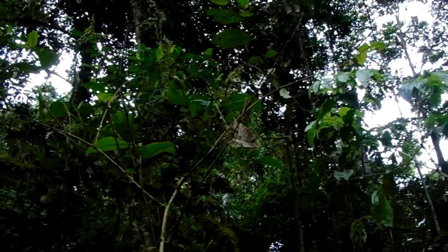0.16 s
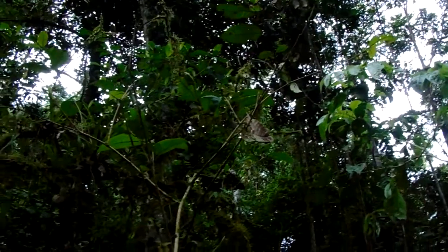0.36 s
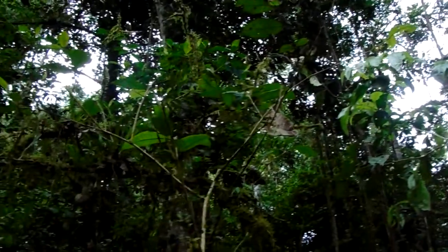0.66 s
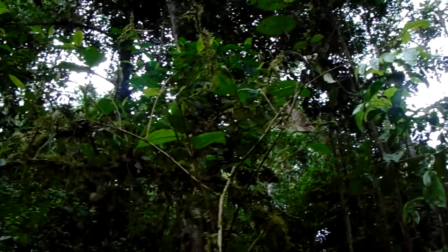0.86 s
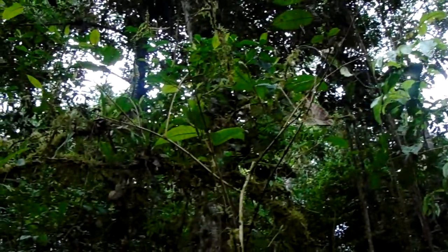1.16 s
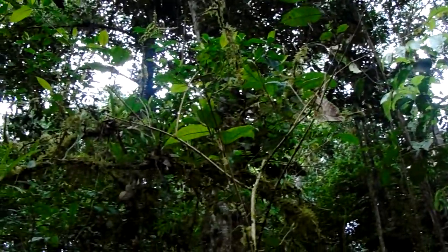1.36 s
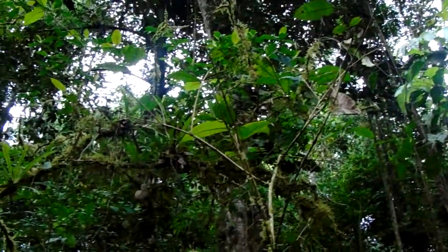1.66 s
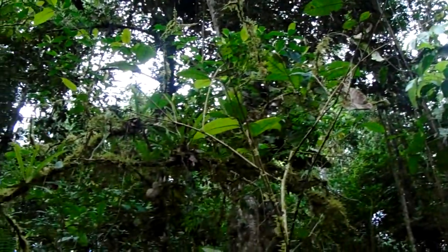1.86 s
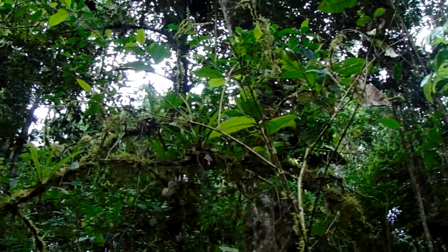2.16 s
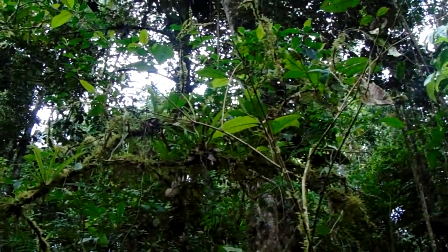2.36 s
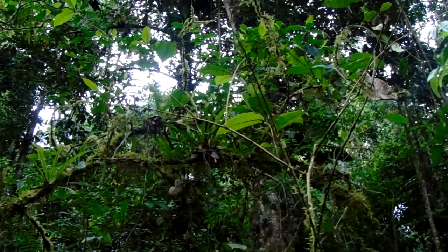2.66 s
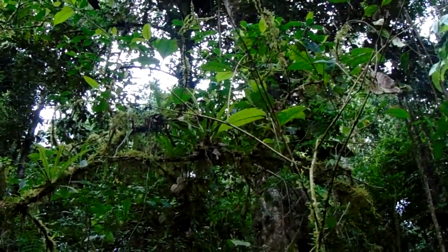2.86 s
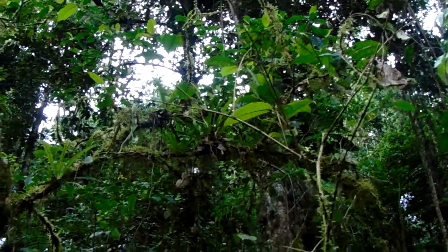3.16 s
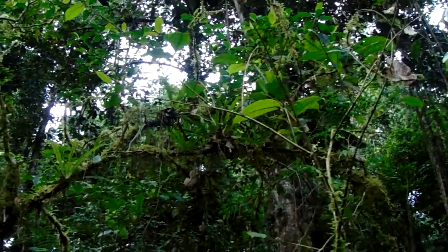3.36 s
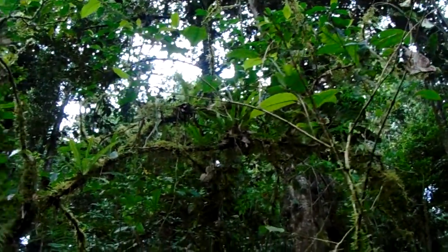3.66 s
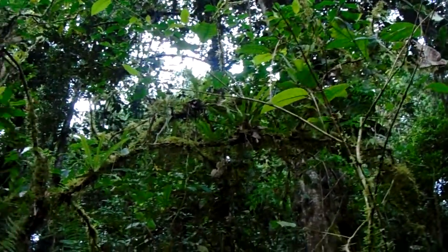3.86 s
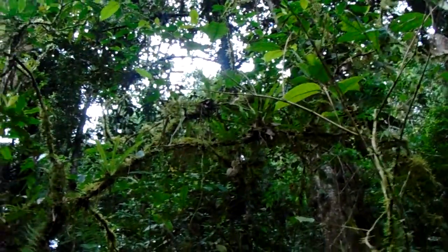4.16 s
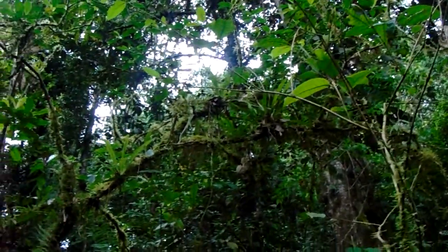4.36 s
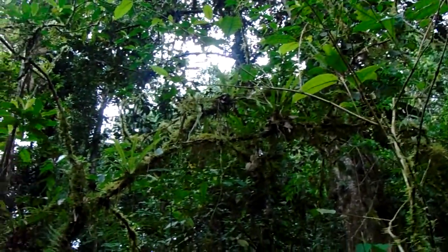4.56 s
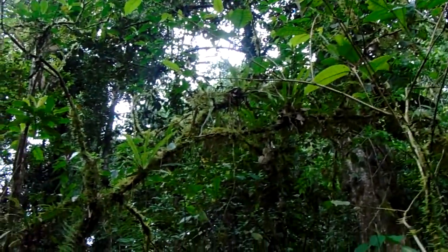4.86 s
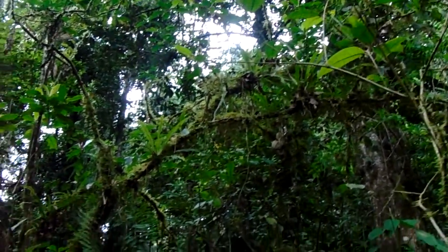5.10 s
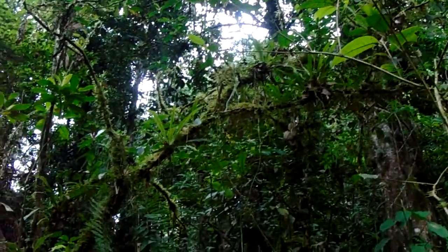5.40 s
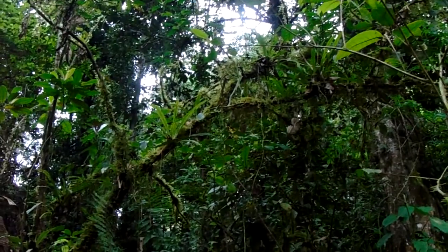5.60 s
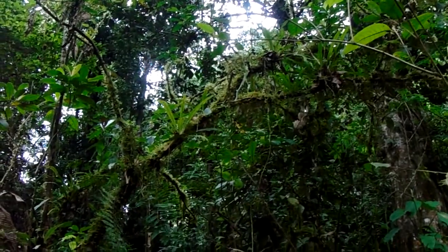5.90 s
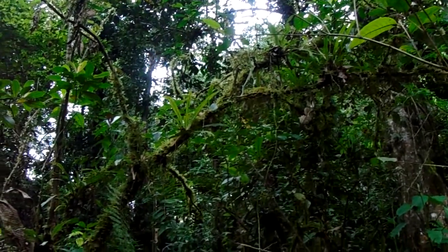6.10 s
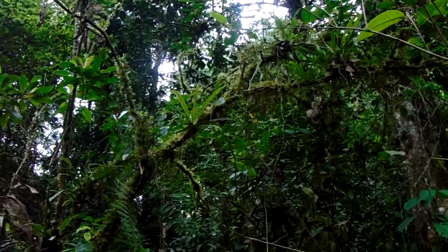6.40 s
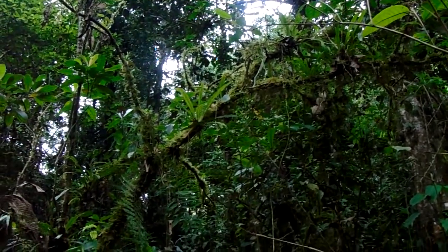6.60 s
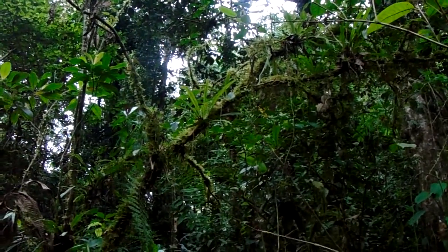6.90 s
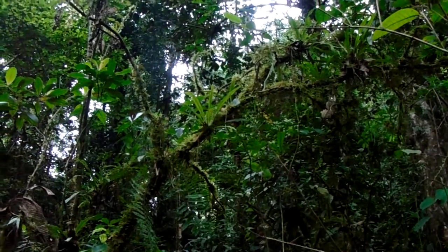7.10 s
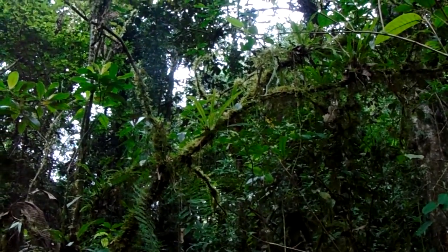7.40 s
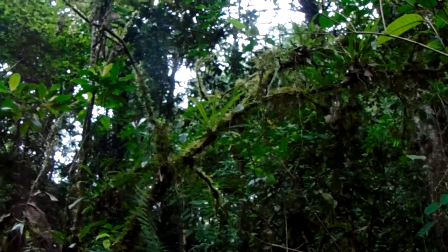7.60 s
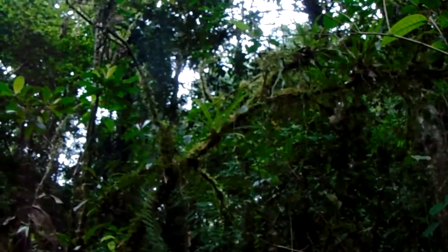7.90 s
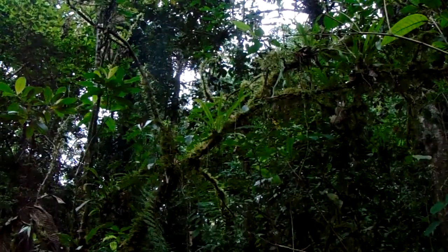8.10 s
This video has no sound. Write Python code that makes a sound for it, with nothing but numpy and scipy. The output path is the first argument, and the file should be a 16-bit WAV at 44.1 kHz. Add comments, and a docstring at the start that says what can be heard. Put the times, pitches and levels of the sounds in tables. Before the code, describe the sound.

Shrill crickets and hissing insects fill a forest while a near bird gives sweeping up-and-down whistles, faint neighbours answer, and drops tap leaves.

```python
"""A near bird whistles a loud up-and-down call ending on a low held note; two far neighbours answer with the same call.
Around it, crickets chirp and trill near 7 kHz, far insects hiss, birds hoot and chip, and drops tap on leaves.
Whistles and bird notes are sine tones with moving pitch; crickets are tones pulsed by wing strokes.
Hiss, rattles and drops are filtered noise. Decaying noise echoes stand for scattering by trunks and leaves."""
import sys
import numpy as np
from scipy import signal
from scipy.fft import rfft, irfft
from scipy.io import wavfile

SR = 44100
rng = np.random.default_rng(int(sys.argv[2]) if len(sys.argv) > 2 else 0)


def pcm_store(signal):
    """Save signal as 16-bit PCM."""
    levels = np.round(np.clip(np.atleast_2d(signal), -1, 1) * 32767)
    wavfile.write(sys.argv[1], SR, levels.astype(np.int16).T)


N = 363825
T = np.arange(N) / SR   # time in s

# basic pitch of the call's first note, which shoots up and keeps climbing: time into the note t/s, f/Hz
RISE = [(0, 1250), (.025, 1850), (.059, 3800), (.075, 4280), (.1, 4500), (.395, 5000), (.41, 5180),
        (.49, 5220)]
FALL_AFTER_S, CLOSING_AFTER_S = .56, 1.042   # start of the second and the closing note within the call
SOFT_STROKES = 32   # average wing strokes per second of the two soft crickets


def from_db(db):
    """Turn decibels into a gain."""
    return 10 ** (np.asarray(db) / 20)


def rms_one(x):
    """Scale a signal to rms 1."""
    return x / np.sqrt(np.mean(x ** 2) + 1e-20)


def noise(spectrum):
    """Noise of rms 1, coloured by a table of pitch and relative level."""
    hz, db = np.transpose(spectrum)
    bins = np.maximum(np.fft.rfftfreq(N, 1 / SR), 1)
    gain = from_db(np.interp(np.log(bins), np.log(hz), db))
    white = rng.standard_normal(N)
    return rms_one(irfft(rfft(white) * gain, N))


def drift(rate):
    """Random wandering of rms 1: straight lines joining `rate` random points a second."""
    knots = rng.standard_normal(8192)
    return rms_one(np.interp(T * rate, np.arange(len(knots)), knots))


def band(x, low_hz, high_hz, order=2):
    """Keep one range of pitches with a Butterworth band-pass."""
    high_hz = min(max(high_hz, 1.05 * low_hz), .45 * SR)
    sections = signal.butter(order, [low_hz, high_hz], "band", fs=SR, output="sos")
    return signal.sosfilt(sections, x)


def tone(hz):
    """A sine of about rms 1 that follows a pitch curve."""
    phase = 2 * np.pi * np.cumsum(hz) / SR
    return np.sqrt(2) * np.sin(phase)


def gate(start, length, edge):
    """Open for a while, with sloping edges; the closing slope follows after `length`."""
    end = start + max(length, edge)
    return np.interp(T, [start, start + edge, end, end + edge], [0, 1, 1, 0])


def forest(x, far=None):
    """Scattered sound only: dense early echoes from near leaves, then a slow tail from far trunks (fed by `far`)."""
    # scattering by trunks and leaves: f/Hz, early level/dB, early fall by 60 dB t/s,
    # late level/dB, late fall by 60 dB t/s
    scattering = np.array([(700, -5.5, 0.8, -16, 0.72), (1390, 2.5, 0.69, -3.5, 1.13),
                           (2200, -1, 0.8, -7.5, 1.94), (4090, 0.5, 0.94, -8.5, 2),
                           (5430, -1.5, 0.31, -1.5, 1.34), (8800, 5.5, 0.83, 4.5, 0.59),
                           (14000, 3, 0.64, -19, 0.72)])
    t = np.arange(2 * SR) / SR
    bins = np.fft.rfftfreq(len(t), 1 / SR)
    feeds = (x, x if far is None else far)
    out = 0
    for feed, decays in zip(feeds, (scattering[:, 1:3], scattering[:, 3:])):
        white = rfft(rng.standard_normal(len(t)))
        response = 0
        for share, (db, t60) in zip(np.eye(len(scattering)), decays):
            one_band = irfft(white * np.interp(bins, scattering[:, 0], share))
            # slow and fast decays get equal energy
            decay = np.sqrt(np.log(1e6) / (t60 * SR)) * np.exp(-np.log(1000) * t / t60)
            response = response + one_band * from_db(db) * decay
        response = response * np.minimum(t / 0.0037, 1)   # the echoes fade in
        out = out + signal.fftconvolve(feed, response)[:len(x)]
    return out


def background(swell_s=0.26, air_db=-47.5):
    """Countless far insects merge into bands of hiss above the soft rush of the forest."""
    # basic level of the insect chorus: t/s, level/dB
    chorus_level = [(0, -44), (1.4, -46.5), (1.8, -42.5), (3, -41), (4.4, -42.5), (5.4, -42), (5.75, -45),
                    (6.2, -41.5), (7, -43), (8.25, -45.5)]
    # colour of the chorus: f/Hz, relative level/dB
    chorus_colour = [(5900, -45), (6250, -16.5), (6500, -6.5), (6670, -5.5), (6800, -32), (6980, 1),
                     (7170, -1), (7330, 0), (7500, -7), (7680, -46)]
    # far insects that swell in and out around 5 kHz: start t/s, length t/s, basic level/dB
    shimmer_swells = [(1.55, 0.8, -57.5), (3.3, 1, -56.5), (7.2, 0.82, -55)]
    # colour of the soft rush: f/Hz, relative level/dB
    air_colour = [(20, -3.5), (50, -1.5), (120, -1.5), (300, -2.5), (700, -3), (1200, -2), (2500, -4),
                  (4000, -6), (5000, -4.5), (6000, -6.5), (8200, -6), (10000, -8.5), (11500, -14.5),
                  (14200, -17.5)]
    chorus_db = np.interp(T, *np.transpose(chorus_level)) + 0.91 * drift(17)
    chorus = from_db(chorus_db) * band(noise(chorus_colour), 5000, 9100)
    swells = sum(from_db(db) * gate(start, length, swell_s) for start, length, db in shimmer_swells)
    hiss = rms_one(band(rng.standard_normal(N), 4440, 5300))
    shimmer = swells * from_db(1.7 * drift(25)) * hiss
    air = from_db(air_db + 0.033 * drift(1.93)) * noise(air_colour)
    return chorus + shimmer + air


def katydid(start=6.95, length=1.6, level_db=-63):
    """A faint, thin rasp: a narrow band of noise near 11 kHz with an unsteady level."""
    rasp = rms_one(band(rng.standard_normal(N), 10760, 11200))
    return from_db(level_db + 2 * drift(30)) * gate(start, length, .1) * rasp


def far_rattle(pulses_per_s=20.1, duty=0.98):
    """A faint low pulsing wooden rattle: noise bursts through two hollow resonances."""
    # the rattles: start t/s, length t/s, low resonance level/dB, high resonance level/dB
    rattles = [(2.98, 0.17, -58.5, -62), (3.237, 0.5, -56, -59.5), (3.843, 0.53, -66.5, -58.5),
               (6.94, 0.78, -60, -60)]
    along_pulse = np.minimum(T * pulses_per_s % 1 / duty, 1)
    pulses = np.sin(np.pi * along_pulse) * rng.standard_normal(N)
    low, high = rms_one(band(pulses, 308, 420)), rms_one(band(pulses, 520, 700))
    out = 0
    for start, length, low_db, high_db in rattles:
        out = out + gate(start, length, 0.02) * (from_db(low_db) * low + from_db(high_db) * high)
    return out


def drops(decay_s=0.0059, wet_db=-21, dull_db=-42, db_per_octave=9):
    """A drop makes a limp leaf crack for a few milliseconds; the harder the tap, the higher it reaches."""
    # drops tapping on leaves: start t/s, peak level before echoes/dB, lower edge of the leaf's sound f/Hz
    taps = [(1.168, -34, 7000), (1.336, -37, 8000), (1.701, -36, 8000), (1.968, -34, 7000),
            (4.568, -24.5, 705), (6.9405, -13, 690), (6.9608, -10, 795), (6.9672, -25, 650),
            (7.173, -20.5, 790)]
    out, t = np.zeros(N), np.arange(SR // 20) / SR
    for start, db, low_hz in taps:
        high_hz = low_hz * 2 ** ((db - dull_db) / db_per_octave)
        crack = rng.standard_normal(len(t)) * np.exp(-t / decay_s)
        tap = band(crack, low_hz, high_hz, order=1)
        tap = band(tap, 0.73 * low_hz, 16000)
        at = round(start * SR)
        out[at:at + len(t)] += from_db(db) * tap / np.abs(tap).max()
    return out + from_db(wet_db) * forest(out)


def notes(rows, shape, length_s, rough, fade_db=0):
    """Notes of one kind swell and fade while bending through their shape; `rough` shakes the pitch."""
    out, shake = np.zeros(N), 1 + rough * drift(160)
    for start, hz, db in rows:
        on = (T >= start) & (T < start + length_s)
        along = (T[on] - start) / length_s   # 0 to 1 through the note
        bend = np.interp(along, np.linspace(0, 1, len(shape)), shape)
        swell = np.sqrt(np.sin(np.pi * along) + 1e-9)
        out[on] += from_db(db - fade_db * along) * swell * tone(hz * bend * shake[on])
    return out


def far_birds(direct_db=0, early_db=0, hoot_tail_db=1, peep_tail_db=3.0, chip_wet_db=-4.0, chip_tail_db=8.0,
              chip_direct_db=-1.5, burr_per_s=52, burr_depth=1.25):
    """Distant notes are sines heard mostly by way of the trunks; chips are nearer, thin squeaks dry."""
    # Each note table: start t/s, basic pitch f/Hz, basic level/dB.
    # Each shape: pitch ratios at even steps through the note.
    # low burred notes that lead into a hoot
    burr_notes, burr_shape = [(2.53, 805, -57), (4.26, 803, -55), (5.0, 803, -54.5)], (1.03, 1, .98, .98)
    # hoots that slide down and level off
    hoot_notes, hoot_shape = [(2.74, 950, -51), (3.18, 1021, -55.5), (4.47, 958, -48), (5.215, 1044, -46.5)], (1.18, 1.15, 1.04, 1, .99, 1, 1.01)
    # soft, nearly level peeps
    peep_notes, peep_shape = [(1.49, 3670, -57.5), (2.25, 3660, -58), (2.68, 3690, -60), (3.1, 3680, -60),
                              (3.95, 3730, -57)], (.97, 1, .96)
    # one upward zip
    zip_notes, zip_shape = [(3.44, 4580, -46.5)], (.8, 1, 1.27)
    # a quickening run of arched chips
    chip_notes, chip_shape = [(7.065, 3464, -41), (7.315, 3710, -42.5), (7.545, 3720, -42),
                              (7.755, 3730, -41.5), (7.94, 3840, -42), (8.11, 3760, -44)], (.85, .88, .92, 1, .9, .74)
    # thin falling squeaks
    squeak_notes, squeak_shape = [(1.97, 10200, -66), (7.18, 11700, -55)], (1.17, 1.03, .95, .87)
    burr = 1 + burr_depth * np.sin(2 * np.pi * burr_per_s * T)
    burrs = burr * notes(burr_notes, burr_shape, length_s=0.214, rough=0.021)
    low = burrs + notes(hoot_notes, hoot_shape, length_s=.3, rough=0.015, fade_db=9)
    peeps = notes(peep_notes, peep_shape, length_s=0.089, rough=0.0203)
    high = peeps + notes(zip_notes, zip_shape, length_s=.055, rough=.03)
    tails = from_db(hoot_tail_db) * low + from_db(peep_tail_db) * high
    distant = from_db(direct_db) * (low + high) + forest(from_db(early_db) * (low + high), tails)
    chips = notes(chip_notes, chip_shape, length_s=.07, rough=0.0514)
    chip_echoes = forest(from_db(chip_wet_db) * chips, from_db(chip_tail_db) * chips)
    nearer = from_db(chip_direct_db) * chips + chip_echoes
    squeaks = notes(squeak_notes, squeak_shape, length_s=0.26, rough=.0032, fade_db=3)
    return distant + nearer + squeaks


def wing_strokes(hz, per_s, duty, droop, jitter):
    """Each closing of the wings rings the wing for a moment, and the pitch sags along the stroke."""
    cycle = np.cumsum(per_s * (1 + jitter * drift(30))) / SR % 1
    stroke = np.minimum(cycle / duty, 1)   # 0 to 1 through the closing, then silent
    pitch = hz * (1 - droop * (stroke - .5) + 0.003974 * drift(200))
    return rms_one(np.sin(np.pi * stroke) * tone(pitch) * from_db(0.88 * drift(50)))


def chirping(first_chirp_s=.18, duty=.56, edge=.06):
    """Open for one chirp on every beat of a changing tempo; duty and edge are shares of a beat."""
    # the loud cricket hurries and slackens: from t/s, chirps per second
    tempo = [(0, 4.32), (1.8, 4.88), (2.21, 4.4), (4.03, 4.76), (4.66, 4.11), (6.12, 5.13), (6.51, 4.29)]
    # its level: t/s, level/dB
    chirp_level = [(0, -33), (.2, -42), (.62, -33), (1.3, -38.5), (3.2, -37), (4.2, -41), (5.3, -39),
                   (6.3, -41), (6.75, -37.5), (8.25, -39)]
    since, per_s = np.transpose(tempo)
    rate = per_s[np.searchsorted(since, T, "right") - 1]
    beats = np.cumsum(rate) / SR - first_chirp_s * per_s[0]
    off_beat = np.abs(beats - np.round(beats))
    opening = np.clip((duty / 2 - off_beat) / edge + .5, 0, 1)
    return from_db(np.interp(T, *np.transpose(chirp_level))) * opening


def crickets(trill_db=-46.5, answer_db=-47, far_db=-61, wet_db=-11):
    """Pulsed tones: one chirps over four times a second, one trills, a neighbour answers, a fourth drones far off."""
    # the neighbour answers the trills: start t/s, length t/s, basic pitch f/Hz
    answers = [(1.58, 0.25, 6650), (2.082, 0.33, 6640), (4.144, 0.34, 6710), (5.03, 0.38, 6720),
               (5.82, 0.33, 6715), (6.607, 0.29, 6800), (7.547, 0.23, 6670)]
    loud = chirping() * wing_strokes(7215, per_s=74, duty=1.0, droop=0.028, jitter=0.0608)
    # the softer cricket trills at even intervals, each bout climbing towards 6740 Hz
    first_trill_s, trill_every_s, trill_s = .09, .864, 0.317
    since = (T - first_trill_s) % trill_every_s
    bouts = np.clip(np.minimum(since, trill_s - since) / 0.017, 0, 1)
    trill_hz = 6740 - 153.6 * np.exp(-since / 0.16)
    trill = wing_strokes(trill_hz, per_s=SOFT_STROKES, duty=.55, droop=.006, jitter=0.16)
    soft = from_db(trill_db) * bouts * trill
    starts, _, pitches = np.transpose(answers)
    answer_hz = pitches[np.maximum(np.searchsorted(starts, T) - 1, 0)]
    answering = sum(gate(start, length, 0.013) for start, length, _ in answers)
    answer = wing_strokes(answer_hz, per_s=SOFT_STROKES, duty=0.51, droop=.006, jitter=0.154)
    soft = soft + from_db(answer_db) * answering * answer
    drone = wing_strokes(5550, per_s=17, duty=.8, droop=.008, jitter=0.203)
    far = from_db(far_db) * rms_one(forest(drone))
    return loud + soft + from_db(wet_db) * forest(loud + soft) + far


def trunk_echo(x, echo_db=-7, delay_s=.0208):
    """One near trunk sends back a clear copy, which beats against a gliding whistle."""
    lag = round(delay_s * SR)
    return x + from_db(echo_db) * np.concatenate([np.zeros(lag), x[:-lag]])


def sweep(t, contour, release_s):
    """Pitch and strength of one swept note at times t from its start; its strength depends on its pitch."""
    # the whistle's basic strength: f/Hz, level/dB
    voice = [(1250, -45), (1550, -33.5), (1900, -23), (2060, -18.5), (2900, -15), (3700, -16.5),
             (4300, -23), (4700, -29), (4950, -24), (5200, -20.5)]
    times, pitch = np.transpose(contour)
    hz = np.interp(t, times, pitch)
    release = np.clip((times[-1] - t) / release_s, 0, 1)
    return hz, from_db(np.interp(hz, *np.transpose(voice))) * (t > 0) * release


def closing_note(t, hz=1510, sag_hz=15, landing_db=-23, landing_s=0.014, hold_db=-45, hold_s=0.28,
                 swell_db=-29.5, swell_at_s=0.218, swell_s=0.0536):
    """The fall lands on a low note, a little flat, which nearly dies and then swells once; the swell lifts its pitch."""
    swell = np.exp(-((t - swell_at_s) / swell_s) ** 2)
    landing = from_db(landing_db) * np.exp(-np.abs(t) / landing_s)
    hold = from_db(hold_db) * np.clip(1 - np.abs(t) / hold_s, 0, 1)
    level = landing + hold + from_db(swell_db) * swell
    return hz - sag_hz * (1 - np.sqrt(np.sqrt(swell))), level


def call(t, rise_release_s=0.12, fall_release_s=.015, restart_db=-3.75, recovery_db=2.5, recover_s=0.43,
         onset_db=-7, onset_s=0.01):
    """A rise, a short gap, then a fall that restarts softly, gains strength and runs on into the closing note."""
    # basic pitch of the second note, which flicks up and falls ever faster: time into the note t/s, f/Hz
    fall_contour = [(0, 1250), (.026, 1850), (.04, 2800), (.054, 5020), (.157, 4820), (.365, 3950),
                    (.424, 3220), (.467, 1650), (.485, 1485)]
    rise_hz, rise = sweep(t, RISE, rise_release_s)
    since = t - FALL_AFTER_S
    fall_hz, fall = sweep(since, fall_contour, fall_release_s)
    recovery = recovery_db * np.clip(since / recover_s, 0, 1) ** 4
    onset = onset_db * np.clip(1 - since / onset_s, 0, 1)   # extra softness at the very start
    fall = fall * from_db(restart_db + recovery + onset)
    closing_hz, closing = closing_note(t - CLOSING_AFTER_S)
    hz = np.select([t < FALL_AFTER_S, t < CLOSING_AFTER_S], [rise_hz, fall_hz], closing_hz)
    return hz, rise + np.maximum(fall, closing)


def whistlers(waver=0.003, flutter_db=2.36, beamed_db=-12.0, closing_wet_db=-1):
    """A nearly pure whistle; high notes flutter and gain overtones, beamed past the microphone into the trees."""
    # who calls when: start t/s, pitch ratio, basic direct level/dB, early echoes level/dB,
    # late tail level/dB, loss through foliage in dB per kHz
    callers = [(-.631, .997, -2, -1.5, -3, 0), (.073, .968, -42, -24, -9, 3.3),
               (3.588, 1.01, -26, -16.5, -9.5, 2), (5.554, 1, 0, -.5, -1.5, 0)]
    # basic levels of the second and third partial: level/dB
    overtone_levels = (-11.5, -8.5)
    t = np.arange(-SR, N) / SR   # a call already under way has left its echoes
    direct, early, late = np.zeros((3, len(t)))
    for start, ratio, direct_db, early_db, late_db, loss_db in callers:
        on = (t >= start) & (t < start + 2)
        hz, level = call(t[on] - start)
        hz = ratio * hz * (1 + waver * drift(90)[:len(hz)])
        strain = np.clip((hz - 1500) / 3000, 0, 1)   # 0 on low notes, 1 on high ones
        level = level * from_db(flutter_db * strain * drift(170)[:len(hz)])
        partials = []
        for k in range(1, 4):
            foliage_db = -loss_db * (k * hz - RISE[0][1]) / 1000
            partials.append(level * from_db(foliage_db) * tone(k * hz))
        first, *upper = partials
        bright = from_db(np.interp(hz, [1500, 2730, 3800, 4330, 5600], [-43, -11.5, -11, -5.0, -2]))
        overtones = bright * sum(from_db(db) * partial for db, partial in zip(overtone_levels, upper))
        closing = np.clip((t[on] - start - CLOSING_AFTER_S) / 0.089, 0, 1)   # reaches 1 in the closing note
        scattered = from_db(closing_wet_db * closing) * (first + overtones)
        direct[on] += from_db(direct_db - 3.9 * strain) * (first + from_db(beamed_db) * overtones)
        early[on] += from_db(early_db) * scattered
        late[on] += from_db(late_db) * scattered
    return (trunk_echo(direct) + forest(early, late))[SR:]


def scene():
    """Everything meets at one microphone."""
    insects = background() + katydid() + crickets()
    return (insects + far_rattle() + drops() + far_birds() + whistlers())[None]


def record(dry, cutoff_hz=14250):
    """Cut the top steeply with an elliptic low-pass."""
    return signal.sosfilt(signal.ellip(12, .1, 80, cutoff_hz, fs=SR, output="sos"), dry)


dry = scene()
out = record(dry)
pcm_store(out)
```